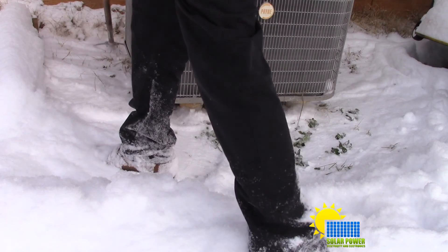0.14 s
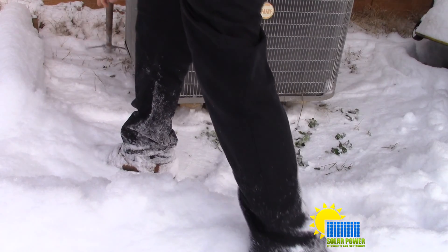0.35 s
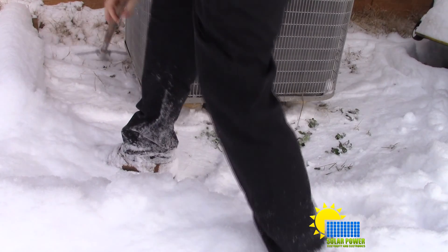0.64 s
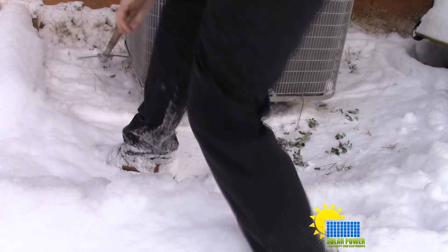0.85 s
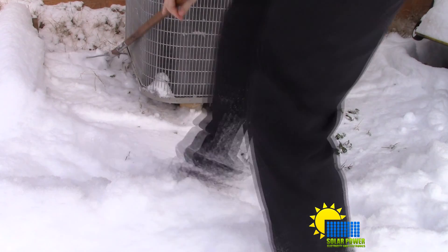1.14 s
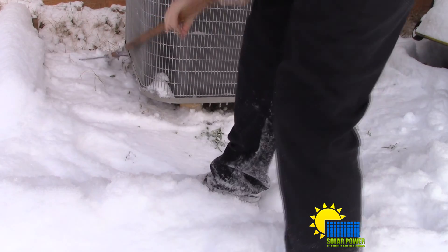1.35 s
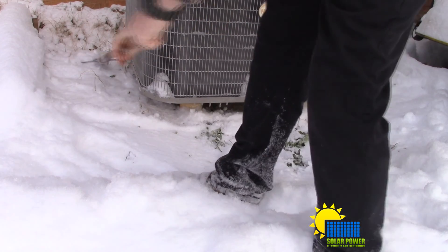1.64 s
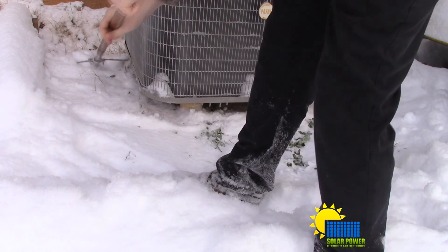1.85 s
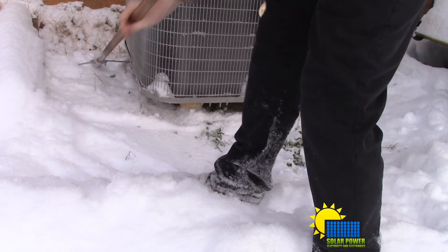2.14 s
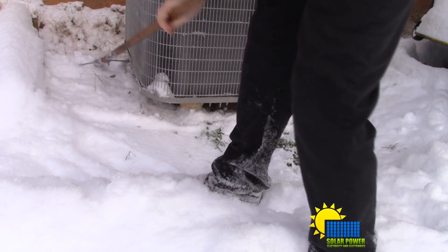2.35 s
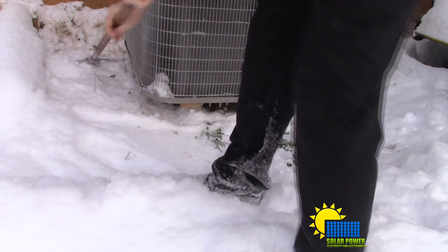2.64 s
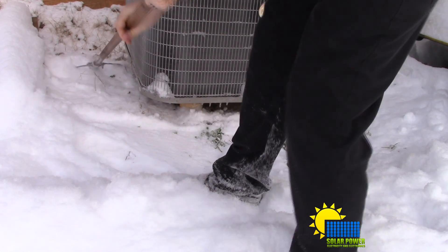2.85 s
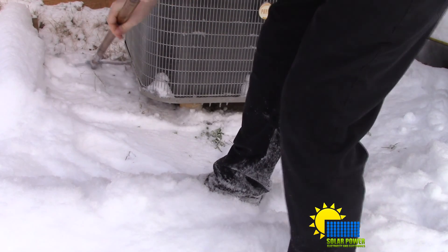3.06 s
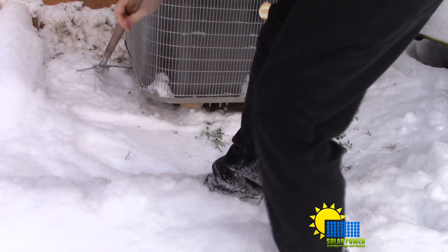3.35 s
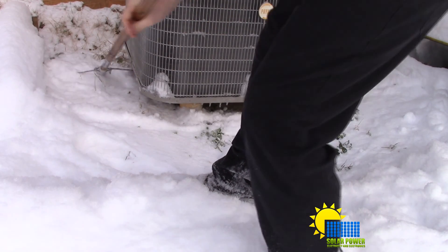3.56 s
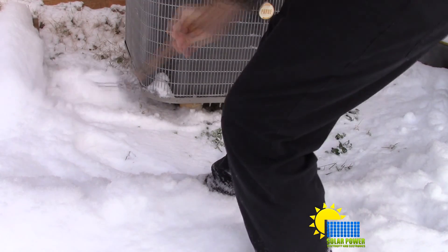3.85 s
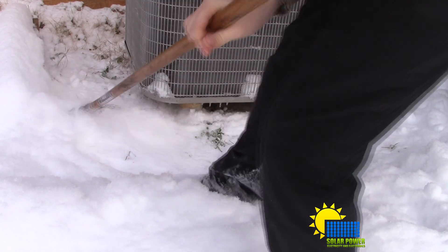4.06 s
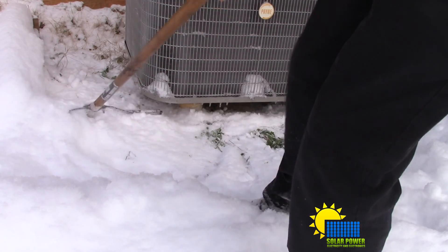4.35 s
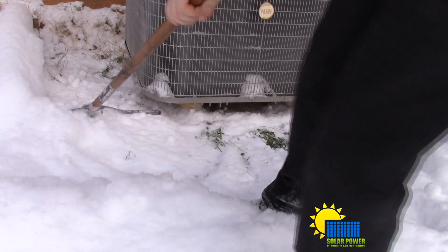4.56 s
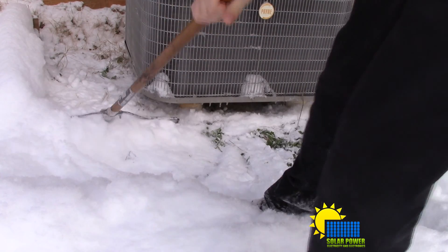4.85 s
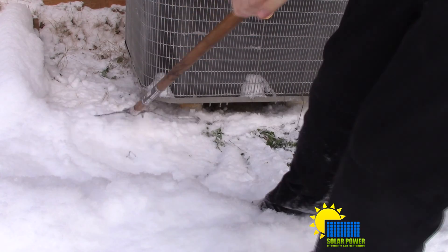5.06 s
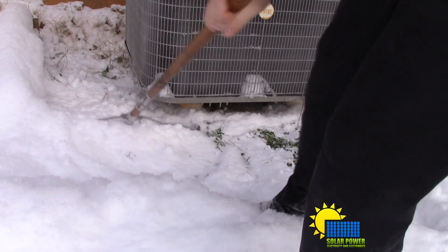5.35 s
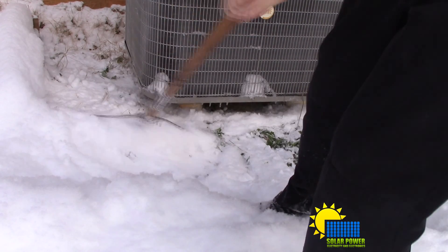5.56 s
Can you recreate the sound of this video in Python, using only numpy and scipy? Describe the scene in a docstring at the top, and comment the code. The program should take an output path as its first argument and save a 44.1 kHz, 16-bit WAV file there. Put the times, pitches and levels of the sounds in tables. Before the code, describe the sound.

A quiet outdoor hush with soft rustles opens, then a steel tool chops lightly into icy snow around one second. After a soft pause with faint bird whistles, blows return near three seconds, peaking just before four in crunches, cracks and a hollow clunk. Quieter scrapes, boot pops and bird notes follow. Close microphone, slight yard echo.

```python
"""First comes a quiet outdoor hush with soft rustles of a sleeve or of loose snow; then a tool works the crust.
The long steel tool chops, drags and shoves by a house wall: ice breaks are filtered into head, snow and crystals.
The edge rasps with one bright resonance, boots pop the crust with a sinking pitch, and ice and steel crack brightly.
Fading sine waves let the tool ring and clunk, fading noise makes the yard echo, and a faint bird whistles."""
import sys
import numpy as np
from scipy import signal
from scipy.fft import rfft, irfft, next_fast_len
from scipy.io import wavfile
from scipy.ndimage import uniform_filter1d

SR = 44100
rng = np.random.default_rng(int(sys.argv[2]) if len(sys.argv) > 2 else 0)


def inscribe(sig):
    """Save sig as 16-bit PCM at rate SR to the path in sys.argv[1].

    A 1-D sig is mono; a 2-D sig holds one channel per row.
    Samples are clipped to [-1, 1] before scaling.
    """
    pcm = np.round(np.clip(np.atleast_2d(sig).T, -1, 1) * 32767)
    wavfile.write(sys.argv[1], SR, pcm.astype(np.int16))


N = 252252  # length of the scene [samples]

# In all tables, t60 is the time a sound takes to fade by 60 dB.
# tone colour of the outdoor hush: (frequency [Hz], level [dB])
HUSH_COLOUR = [(30, -42), (60, -16), (120, -15), (220, -4.5), (400, -1.5), (600, -2), (1200, -9.5),
               (2300, -14.5), (3500, -20.5), (5600, -23.5), (11400, -32), (16000, -43)]
HUSH_DB = -51  # middle level, which wavers
WHINE_HZ, WHINE_DB = 5580, -78  # middle pitch, level

# runs of like bird notes: (time [s], length of run [s], level [dB])
TWITTERS = [(1.747, .05, -61), (1.981, .115, -57), (2.137, .02, -56), (4.232, .05, -58),
            (4.532, .05, -53.5), (4.712, .08, -59), (5.05, .02, -54), (5.132, .02, -55), (5.584, .08, -56)]
NOTE_EVERY_S, NOTE_S, NOTE_FROM_HZ, NOTE_TO_HZ = .033, .022, 2400, 2144
# a higher chirp, one rising and one falling note: (time [s], length [s], start [Hz], end [Hz], level [dB])
CHIRP_NOTES = [(2.128, .02, 5400, 6200, -60), (2.132, 0.044, 4380, 3850, -55)]
FLUTTER = 0.041  # share of the pitch

# echo of the yard, band by band: (middle frequency [Hz], t60 [s], level [dB])
YARD_BANDS = [(115, 0.68, -21), (241, 2, -15), (550, 1.25, -17), (970, 0.81, -16.5), (2300, 2.2, -28),
              (4170, 0.25, -15.5), (9500, 0.43, -18.5)]

# weight presses the snow down: (time [s], length [s], level [dB], low edge of the main band [Hz])
PRESSES = [(0.55, 0.22, -51, 110), (0.858, 0.082, -54, 128), (1.812, 0.042, -51, 121),
           (2.635, 0.046, -51, 165), (2.73, 0.1, -46, 125), (3.1, 0.035, -57, 100),
           (3.797, 0.028, -27.5, 210), (3.91, .04, -45, 42), (5.063, 0.049, -41.5, 157)]
# fine powder slides off the tool: (time [s], length [s], level [dB], low edge of the main band [Hz])
SPRAYS = [(1.222, 0.073, -52, 8500), (4.462, 0.095, -54.5, 8500)]

# crust gives way under a boot: (time [s], level before the final trim and muffling [dB], basic pitch [Hz])
POPS = [(0.563, -26, 298), (1.505, -29, 304), (1.8157, -21.5, 354), (2.647, -32.5, 216),
        (3.634, -12.5, 486), (4.464, -17.5, 512), (4.5999, -15.5, 510), (4.6043, -25.5, 387),
        (4.612, -15.5, 485), (4.626, -26.5, 315), (4.644, -17.5, 470), (5.071, -25, 615), (5.074, -31, 256),
        (5.0945, -22.5, 420)]
# the snow cover dulls the pops: (frequency [Hz], level [dB])
MUFFLE = [(700, -2), (1200, -1), (2000, -14), (5000, -11)]

# ice snaps, and the bright crack of the steel blow at 3.1 s:
# (time [s], peak level before the trim [dB], pitch [Hz])
CRACKS = [(0.708, -27, 3000), (1.0363, -12.5, 2500), (1.063, -35, 2490), (1.1232, -15, 6100),
          (2.9407, -27.5, 2180), (3.1062, -16, 2600), (3.104, -7, 8300), (3.799, -5, 2680),
          (3.817, -14, 5000), (3.839, -11, 2550), (3.857, -8, 2550), (3.885, -12, 5000), (3.9275, -5, 2800),
          (3.9774, -19, 2040), (4.074, -24.5, 2980), (4.44, -27, 3500), (4.4565, -24.5, 3250),
          (4.691, -28, 3000), (4.9162, -28, 2980)]

# tone colour of each material: (frequency [Hz], level [dB])
HEAD_COLOUR = [(100, -45.5), (330, -14.5), (560, 12), (1000, 5), (1600, 3), (2400, -10.5), (3200, -13),
               (6000, -32), (15000, -80)]
PACKED_COLOUR = [(30, -61), (80, -24.5), (160, -11), (240, 1), (340, 1.5), (470, 1.5), (800, -20),
                 (3000, -56.5)]
CRYSTAL_COLOUR = [(800, -72), (1800, 5.5), (2700, 12), (4000, 9), (5200, 7.5), (6500, 2.5), (9000, 3),
                  (12000, -5.5), (15500, -19)]
# damped resonances of the tool head in the snow: (frequency [Hz], width [Hz], lift [dB])
HEAD_PEAKS = [(621, 120, 2), (945, 226, 5.5), (1620, 77, 1.5), (1880, 160, 3), (2312, 180, 8.5)]

# free ringing of the steel and the handle: (frequency [Hz], level [dB], t60 [s])
RING_MODES = [(230.3, -3, 0.63), (273, 1, .6), (339, -21.5, 0.66), (407, -10.5, .6), (443, 6, 0.62),
              (504, 8, 0.27), (549, -7.5, 0.24), (661, -9, 0.5), (712, 1, 0.42), (914, -9, 0.53),
              (873, -6, 0.14), (1180, -36, .4), (1280, 13, 0.15), (1360, 11, 0.22), (1610, -15, 0.25),
              (1970, -3, 0.18), (2046, 5, 0.38), (2570, 11, 0.13), (3240, -22, .25)]
# the loaded tool lands flat with a hollow clunk: (time [s], level [dB])
CLUNKS = [(3.9277, -13.5)]
# short ringing tones of the clunk: (frequency [Hz], level [dB], t60 [s])
CLUNK_MODES = [(283.3, -6.5, 0.26), (333, 0, 0.17), (391, -0.5, 0.163), (438, 1, 0.12), (511, -1, 0.14),
               (567, -7, 0.099), (646, 1.5, 0.076)]

# the steel edge chatters on ice: (time [s], length [s], level [dB], pitch [Hz])
RASPS = [(1.04, 0.052, -39.5, 2420), (1.846, 0.049, -53, 2840), (2.549, 0.021, -47, 2500),
         (2.94, 0.0083, -39, 2160), (3.101, 0.012, -20, 2370), (3.445, 0.095, -46.5, 2290),
         (3.764, 0.031, -35.5, 2470), (3.8, 0.015, -24, 2890), (4.404, 0.026, -48, 2760),
         (4.833, 0.03, -53, 3200), (4.996, 0.0087, -34, 1850)]

# the tool strikes frozen ground: (time [s], tool head [dB], packed snow [dB], crystals [dB],
# rise [s], basic t60 [s]); blows() trims these levels and adjusts the t60 for each material
BLOWS = [ (0.706, -31.5, -33, -70, 0.00031, 0.073), (1.005, -35.5, -40, -62, 0.00036, 0.063),
         (1.036, -36, -51, -42, 0.00029, 0.06), (1.0655, -21, -28, -39, 0.0025, 0.11),
         (2.772, -24, -32, -48.5, 0.0021, 0.11), (3.1030, -20.5, -31, -32, 0.0014, 0.083),
         (3.735, -24, -30, -55, 0.0013, 0.11), (3.801, -25.5, -25.5, -29.5, 0.00079, 0.18),
         (3.905, -18.5, -23, -27, 0.00021, 0.052), (3.9225, -15.5, -20.5, -30, 0.0021, 0.094),
         (3.944, -27, -30, -41, 0.0027, 0.051), (4.916, -40, -50, -60, 0.0016, 0.062),
         (4.996, -32, -42, -39.5, 0.0053, 0.096), (5.521, -38.5, -42, -58, 0.0011, 0.092)]

# the edge drags through the crust: (time [s], length [s], tool head [dB], packed snow [dB], crystals [dB])
SCRAPES = [ (0.544, 0.16, -46, -51, -55.5), (1.036, 0.04, -33, -51, -42.5), (1.851, 0.07, -39, -48, -60),
           (2.534, 0.087, -41.5, -45, -53), (2.733, 0.043, -42, -41, -54),
           (2.928, 0.078, -44.5, -47.5, -54), (3.058, 0.065, -41, -38.5, -54.5),
           (3.114, 0.059, -30.5, -36, -53), (3.446, 0.098, -35, -38.5, -56),
           (3.621, 0.085, -33, -39.5, -51.5), (3.749, 0.028, -27.5, -29.5, -43),
           (3.793, 0.14, -23, -31.5, -32), (4.405, 0.056, -41, -42.5, -53.5),
           (4.607, 0.081, -39, -44.5, -53.5), (4.833, 0.036, -37.5, -43, -55.5)]
SCRAPE_ATTACK_S, SCRAPE_RELEASE_T60_S = .012, .16
# level change over a scrape as snow piles up: (tool head [dB], packed snow [dB], crystals [dB])
PILE_UP_DB = (-1.5, 0, -1)
# soft rustles of a sleeve or of loose snow, made with the three material colours:
# (middle [s], length [s], tool head [dB], packed snow [dB], crystals [dB])
RUSTLES = [ (0.042, 0.08, -85, -73, -53.5), (0.288, 0.43, -57, -72, -55.5), (0.48, 0.18, -54, -82, -58),
           (0.944, 0.48, -49.5, -48.5, -59), (1.284, 0.079, -48.5, -49, -53.5),
           (1.52, 0.38, -49.5, -51, -57), (1.837, 0.063, -44, -52, -56), (3.392, 0.056, -40, -52, -58),
           (3.617, 0.074, -38.5, -39.5, -56), (4.4, 0.097, -51, -60, -55), (4.908, 0.12, -44, -44, -58),
           (4.992, 0.095, -44, -42.5, -56), (5.24, .07, -50, -48, -61.5), (5.334, 0.15, -48, -51, -49),
           (5.492, 0.24, -51, -66, -55.5), (5.71, 0.26, -52.5, -52.5, -56.5)]
# loosened snow tumbles back: (time [s], tool head [dB], packed snow [dB], crystals [dB])
SPILLS = [(1.085, -35.5, -35.5, -53), (2.79, -42, -36.5, -80), (3.17, -47, -44.5, -72),
          (3.948, -27.5, -26.5, -40)]
SPILL_ATTACK_S = 0.0033
# fading of a spill: (tool head t60 [s], packed snow t60 [s], crystals t60 [s])
SPILL_T60_S = (0.62, 0.83, 0.75)
CHIP_DB = -5  # sparse larger chips among the fine breaks


def undb(db):
    """Turn decibels into a plain gain."""
    return 10 ** (np.asarray(db) / 20)


def unit(x):
    """Scale to an average (rms) level of 1."""
    return x / np.sqrt(np.mean(x ** 2) + 1e-18)


def seconds(length):
    """Time axis of a given length."""
    return np.arange(int(length * SR)) / SR


def fade(t, t60):
    """Die away smoothly, 60 dB down at t60."""
    return np.exp(-np.log(1000) * t / max(t60, 1e-3))


def add(out, start, x):
    """Mix x into out from a given time."""
    i = max(int(start * SR), 0)
    out[i:i + len(x)] += x[:max(len(out) - i, 0)]


def colour(x, points, peaks=()):
    """Shape the tone by (frequency [Hz], level [dB]) points and (frequency [Hz], width [Hz], lift [dB]) peaks."""
    n = 2 * next_fast_len(len(x) // 2 + 2048)
    f = np.arange(n // 2 + 1) * SR / n + 1
    hz, db = np.transpose(points)
    curve = np.interp(np.log(f), np.log(hz), db)
    for centre, width, lift in peaks:
        curve = curve + lift / (1 + (2 * (f - centre) / width) ** 2)
    # fold the cepstrum so that the filter answers only after its input
    cepstrum = irfft(np.log(undb(curve)))
    cepstrum[1:n // 2] *= 2
    cepstrum[n // 2 + 1:] = 0
    response = np.exp(rfft(cepstrum))
    return irfft(rfft(x, n) * response)[:len(x)]


def walk(rate):
    """Wander at random through `rate` new values a second, with a spread near 1."""
    knots = rng.standard_normal(4096)
    return np.interp(np.arange(N) / SR * rate, np.arange(len(knots)), knots)


def fractures(rate, spread_db):
    """Tiny breaks at random moments; a positive spread makes a few stronger, a negative one a few weaker."""
    happens = rng.random(N) < rate / SR
    size = undb(spread_db * np.minimum(rng.exponential(size=N), 4))
    return unit(happens * size * rng.choice([-1, 1], N))


def modes(table):
    """A struck object rings as a sum of fading sine waves, each with a random phase."""
    t = seconds(1.2)
    return sum(undb(db) * np.sin(2 * np.pi * (hz * t + rng.random())) * fade(t, t60)
               for hz, db, t60 in table)


def hush():
    """Outdoor noise that wavers a little, with a faint thin whine of unsteady pitch."""
    noise = unit(colour(rng.standard_normal(N), HUSH_COLOUR)) * undb(HUSH_DB + .5 * walk(2.5))
    whine_hz = WHINE_HZ + 25 * walk(160)
    whine = unit(np.sin(2 * np.pi * np.cumsum(whine_hz) / SR))
    return noise + whine * undb(WHINE_DB)


def yard(x):
    """Scattered echoes from the walls: fading noise in bands, each with its own level and decay."""
    t, response = seconds(1.4), 0
    for hz, t60, db in YARD_BANDS:
        octave = signal.butter(2, [hz / np.sqrt(2), hz * np.sqrt(2)], "band", fs=SR, output="sos")
        build_up = 1 - np.exp(-t / 0.0026)
        tail = rng.standard_normal(len(t)) * fade(t, t60) * build_up
        response = response + signal.sosfilt(octave, tail / np.linalg.norm(tail)) * undb(db)
    return signal.fftconvolve(x, response)[:N]


def whistle(length, from_hz, to_hz):
    """One soft-edged gliding note with a slight flutter in pitch."""
    n = int(length * SR)
    hz = np.linspace(from_hz, to_hz, n) * (1 + FLUTTER * walk(440)[:n])
    return np.sin(2 * np.pi * np.cumsum(hz) / SR) * np.hanning(n) * np.sqrt(2)


def bird():
    """A far bird sings short gliding whistles, in runs of like notes and one higher chirp."""
    out = np.zeros(N)
    for start, length, db in TWITTERS:
        for delay in np.arange(0, length, NOTE_EVERY_S):
            add(out, start + delay, whistle(NOTE_S, NOTE_FROM_HZ, NOTE_TO_HZ) * undb(db))
    for start, length, from_hz, to_hz, db in CHIRP_NOTES:
        add(out, start, whistle(length, from_hz, to_hz) * undb(db))
    return out


def swells(table, skirt_db):
    """Soft puffs of filtered noise; skirt_db sets the level well below the main band."""
    out = np.zeros(N)
    for start, length, db, hz in table:
        n = int(length * SR)
        band = [(hz / 24, -45), (hz / 3, skirt_db), (hz, 0), (hz * 1.48, 0), (hz * 4, -32), (hz * 30, -70)]
        puff = colour(rng.standard_normal(n), band)
        add(out, start, unit(puff * signal.windows.tukey(n, .8)) * undb(db))
    return out


def presses():
    """Snow packs together under weight, in soft low puffs of noise."""
    return swells(PRESSES, skirt_db=-34)


def sprays():
    """Powder slides off the tool, in soft bright puffs of noise."""
    return swells(SPRAYS, skirt_db=2)


def pops():
    """A pocket of snow collapses under a boot: about two cycles that sink in pitch, dulled by the snow."""
    out, t = np.zeros(N), seconds(.03)
    for start, db, hz in POPS:
        cycles = np.cumsum(hz * (0.27 + 1.27 * np.exp(-t * hz / 1.25))) / SR
        wall = np.sin(2 * np.pi * cycles) * cycles ** 2 * np.exp(-cycles / 0.38)
        # the pressure follows the speed of the collapsing wall
        pop = np.gradient(wall)
        add(out, start - .0004, pop / np.abs(pop).max() * undb(db + 1.96))
    return colour(out, MUFFLE)


def clunks():
    """Snow pads the contact, so low tones swell over a few milliseconds and then beat against each other."""
    out = np.zeros(N)
    for start, db in CLUNKS:
        body = modes(CLUNK_MODES)
        body = body * np.tanh(np.arange(len(body)) / SR / 0.0029) ** 2
        loudness = np.std(body[:int(.05 * SR)])  # over the first 50 ms
        add(out, start, body / loudness * undb(db))
    return out


def ring(x, db):
    """The lightly damped steel and handle ring on after every contact."""
    response = modes(RING_MODES)
    return signal.fftconvolve(x, response / np.linalg.norm(response))[:N] * undb(db)


def cracks():
    """Snapping ice, or a hard steel blow, gives a few milliseconds of bright crackle made of fading noise."""
    out, t = np.zeros(N), seconds(.04)
    for start, db, hz in CRACKS:
        burst = rng.standard_normal(len(t)) * np.clip(t / 0.00099, 0, 1) * fade(t, 0.018)
        crack = colour(burst, CRYSTAL_COLOUR, [(hz, hz / 4, 9)])
        add(out, start, crack / np.abs(crack).max() * undb(db - 9.0))
    return out


def rasps():
    """Quick slips of the edge excite one bright resonance, whose pitch depends on where the edge bears."""
    out = np.zeros(N)
    slips = fractures(rate=3800, spread_db=-2.0)
    for start, length, db, hz in RASPS:
        n = int(length * SR)
        force = np.roll(slips, -int(start * SR))[:n] * signal.windows.tukey(n, .4)
        force = np.pad(force, (0, 512))  # room for the resonance to die away
        rasp = colour(force, [(hz / 4, -22), (hz, 0), (hz * 3, -18), (hz * 8, -48)], [(hz, hz / 5, 14)])
        add(out, start, rasp / np.sqrt(np.sum(rasp ** 2) / n + 1e-18) * undb(db))
    return out


def materials():
    """What a force sets sounding: the tool head, the packed snow and the loose crystals."""
    return (HEAD_COLOUR, HEAD_PEAKS), (PACKED_COLOUR, ()), (CRYSTAL_COLOUR, ())


def blows():
    """The edge sinks in and crushes ice for a moment: the crystals die first, the packed snow lasts."""
    out, t = np.zeros(N), seconds(.25)
    crush = fractures(rate=9000, spread_db=1.0)
    stretches, trims_db = (1.0, 1.2, .65), (.3, -1.0, .3)  # t60 factor and level trim of each material
    for start, *levels_db, rise, t60 in BLOWS:
        force = np.roll(crush, -int(start * SR))[:len(t)] * np.clip(t / rise, 0, 1)
        for material, db, stretch, trim_db in zip(materials(), levels_db, stretches, trims_db):
            burst = colour(force * fade(t, t60 * stretch), *material)
            energy = np.sum(burst ** 2) / (.03 * SR)  # as if spread over 30 ms
            add(out, start, burst / np.sqrt(energy) * undb(db + trim_db))
    return out


def patchy(x, rate, patchy_db):
    """Lumps of different size break in turn, so each half octave swells on its own."""
    spectrum = rfft(x)
    f = np.arange(N // 2 + 1) * SR / N
    steps = 2 * np.log2(np.clip(f, 250, 16000) / 250)  # half octaves above 250 Hz
    out = np.zeros(N)
    for k in range(int(steps[-1]) + 1):
        band = irfft(spectrum * np.maximum(1 - np.abs(steps - k), 0), N)
        out += band * undb(patchy_db * walk(rate))
    return out


def effort(k):
    """How loud material k sounds: scrapes bite, hold and let go; rustles swell and sink; spills die away."""
    power, t = np.zeros(N), seconds(1)
    for start, length, *levels_db in SCRAPES:
        bite = np.clip(t / SCRAPE_ATTACK_S, 0, 1)
        pile = undb(PILE_UP_DB[k] * np.minimum(t / length, 1))
        release = fade(np.maximum(t - length, 0), SCRAPE_RELEASE_T60_S)
        add(power, start, (undb(levels_db[k]) * bite * pile * release) ** 2)
    for start, *levels_db in SPILLS:
        attack = np.clip(t / SPILL_ATTACK_S, 0, 1)
        add(power, start, (undb(levels_db[k]) * attack * fade(t, SPILL_T60_S[k])) ** 2)
    for middle, length, *levels_db in RUSTLES:
        along = np.clip((np.arange(N) / SR - middle) / length, -.5, .5)
        power += (undb(levels_db[k]) * np.cos(np.pi * along)) ** 2
    return np.sqrt(power)


def strokes():
    """The edge sticks and slips through the crust, so breaks cluster; the same grains make rustles and spills."""
    fine = fractures(rate=2600, spread_db=1.5)
    chips = undb(CHIP_DB) * fractures(rate=170, spread_db=-0.5)
    clustered = (fine + chips) * undb(1.7 * walk(120))
    force = patchy(clustered, rate=44, patchy_db=2.0)
    out = np.zeros(N)
    for k, material in enumerate(materials()):
        sound = colour(force, *material)
        # even out the running level, so that the effort alone sets the loudness
        level = np.sqrt(uniform_filter1d(sound ** 2, 1536) + 1e-12)
        out += effort(k) * sound / level
    return out


def scene():
    """Everything reaches one point, a little to the right; the yard echoes the tool and the bird."""
    song = bird()
    snow = presses() + sprays() + pops()
    tool = cracks() + rasps() + blows() + strokes()
    tool = tool + ring(tool, db=-22.5) + clunks()
    mono = hush() + song + yard(tool + song) + snow + tool
    left = colour(mono, [(200, -.8), (2000, -.7), (9000, -.2)])
    right = colour(mono, [(200, .75), (2000, .65), (9000, .2)])
    return np.array([left, right])


def record(dry):
    """The recorder clips at full scale and then cuts the treble above 15800 Hz."""
    low_pass = signal.ellip(8, .2, 70, 15800, fs=SR, output="sos")
    return signal.sosfilt(low_pass, np.clip(dry, -1, 1))


dry = scene()
out = record(dry)
inscribe(out)
```